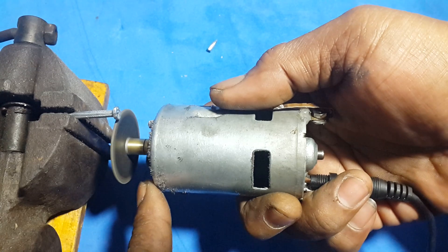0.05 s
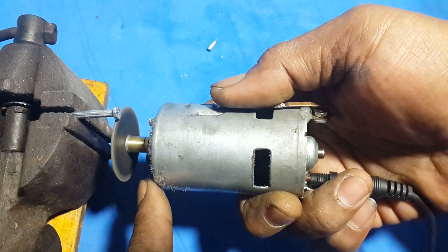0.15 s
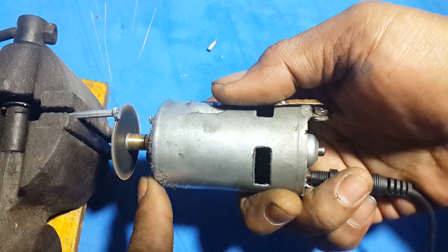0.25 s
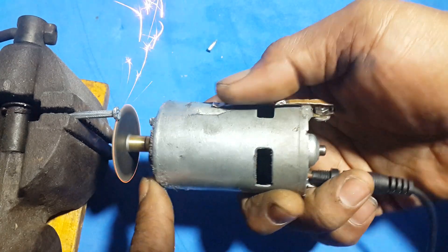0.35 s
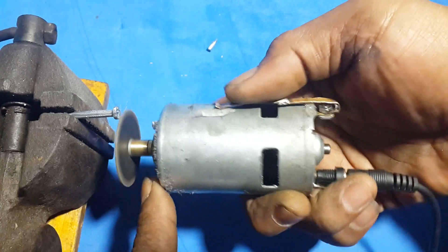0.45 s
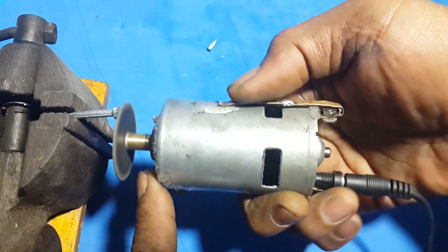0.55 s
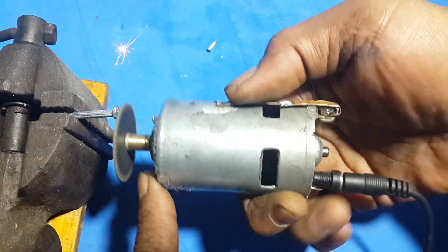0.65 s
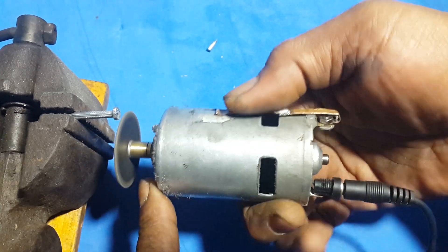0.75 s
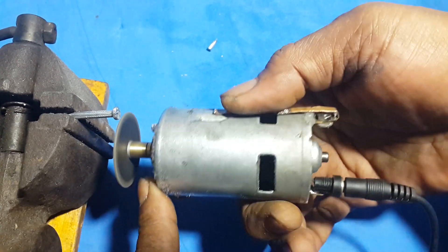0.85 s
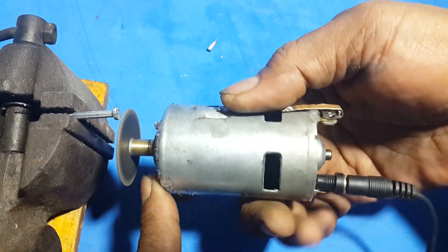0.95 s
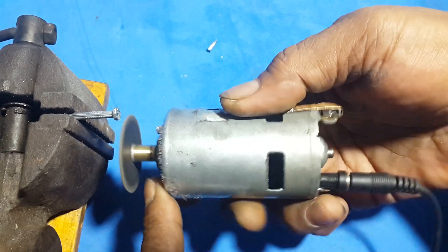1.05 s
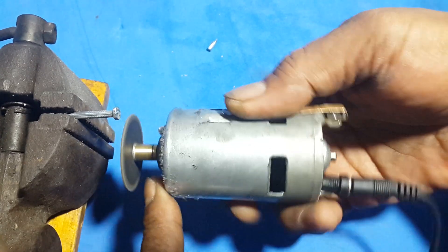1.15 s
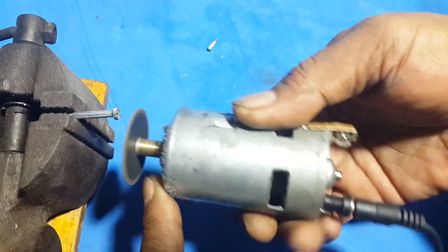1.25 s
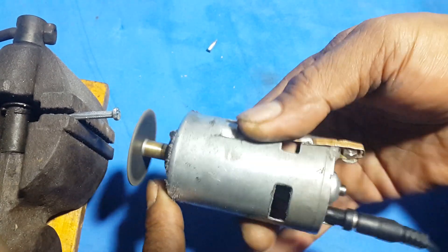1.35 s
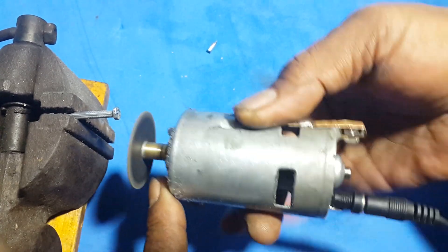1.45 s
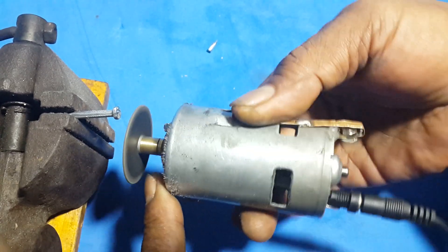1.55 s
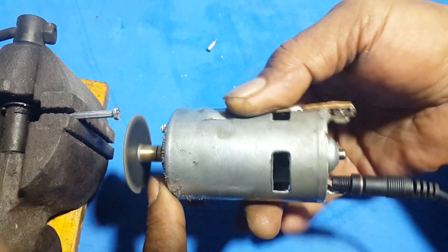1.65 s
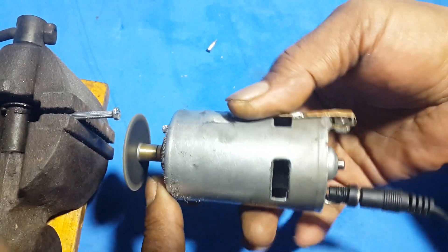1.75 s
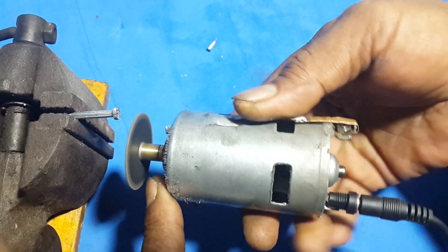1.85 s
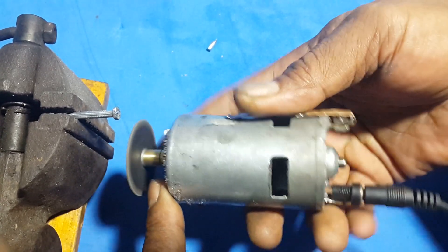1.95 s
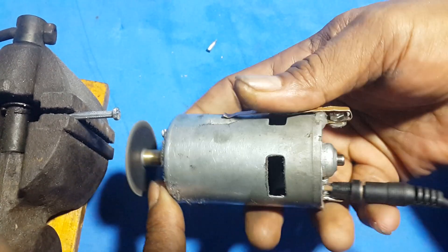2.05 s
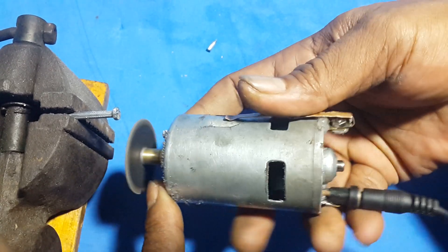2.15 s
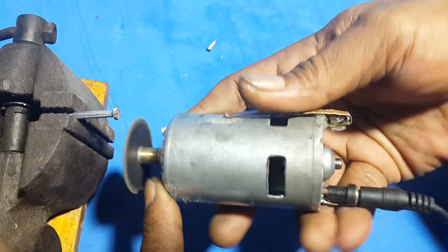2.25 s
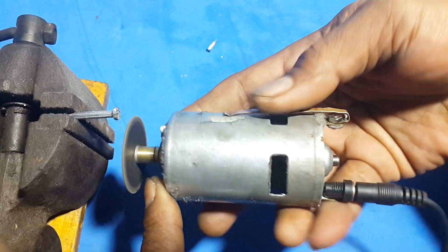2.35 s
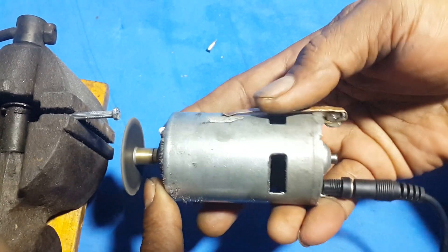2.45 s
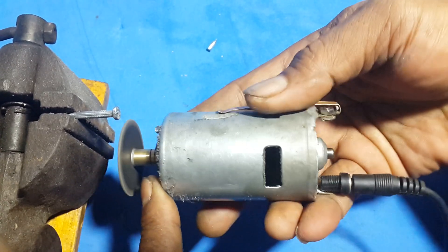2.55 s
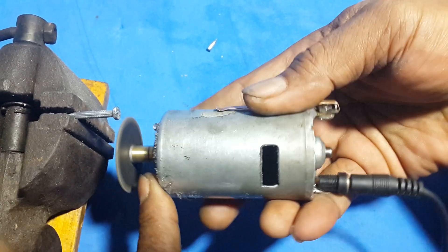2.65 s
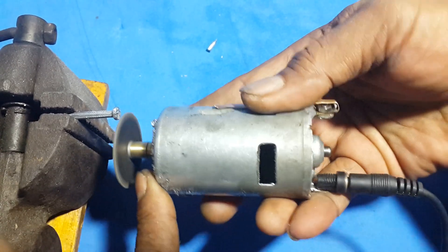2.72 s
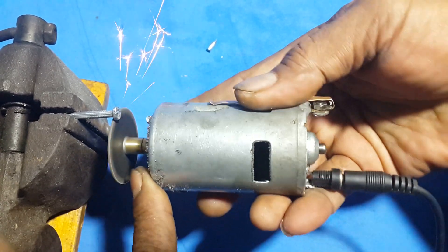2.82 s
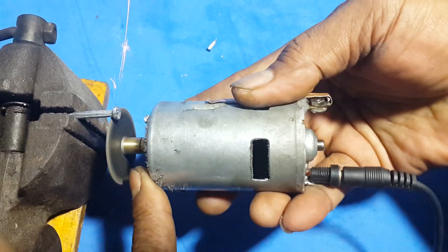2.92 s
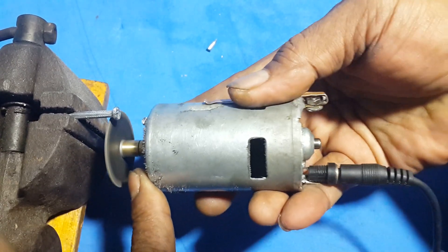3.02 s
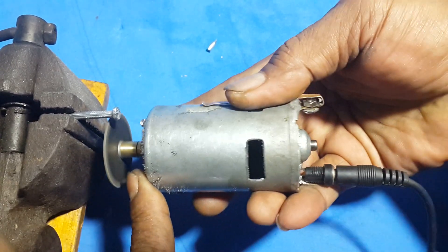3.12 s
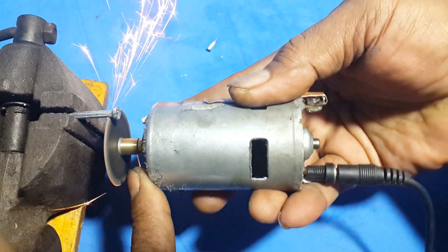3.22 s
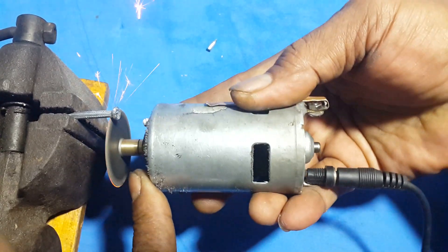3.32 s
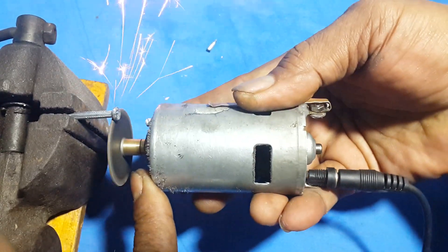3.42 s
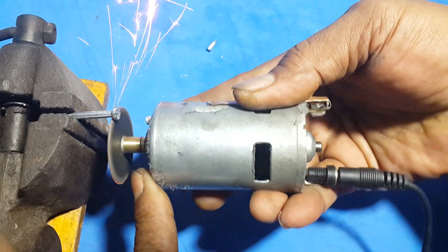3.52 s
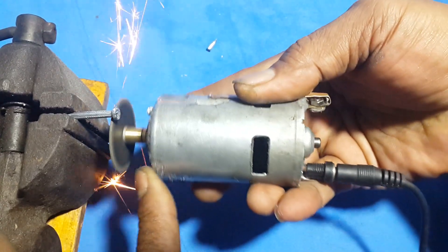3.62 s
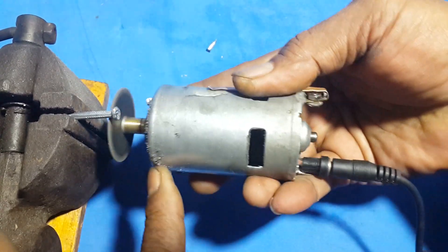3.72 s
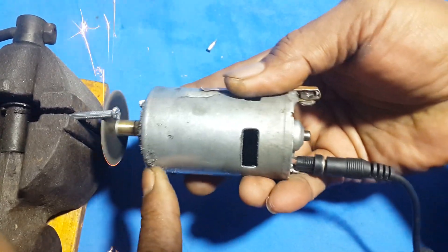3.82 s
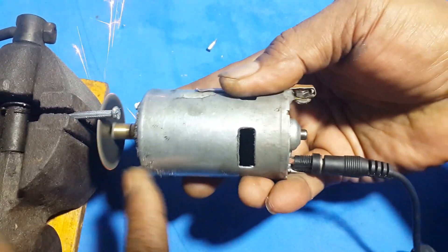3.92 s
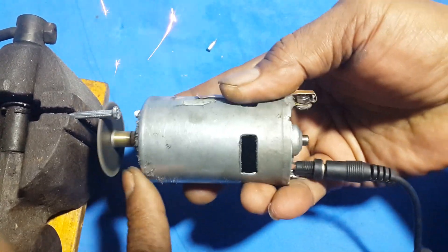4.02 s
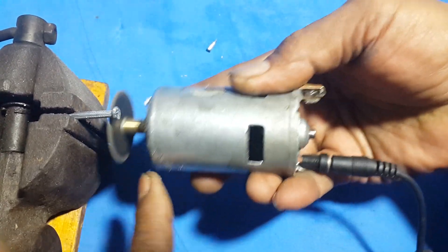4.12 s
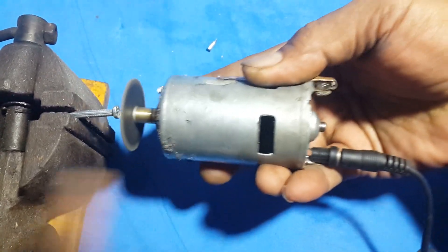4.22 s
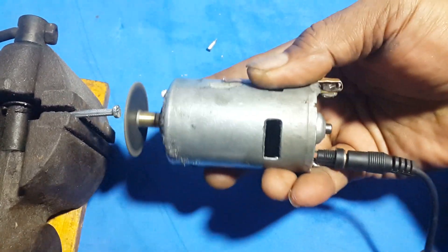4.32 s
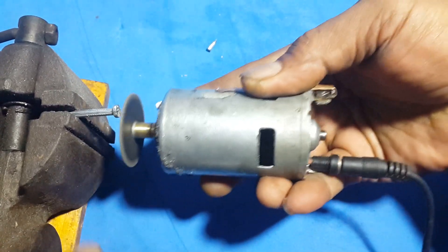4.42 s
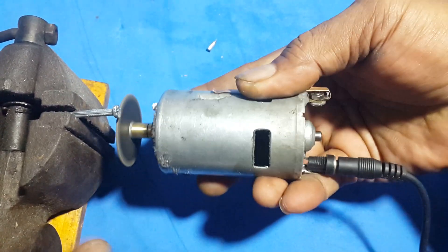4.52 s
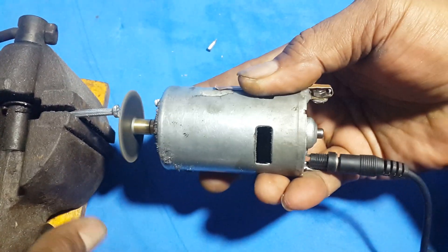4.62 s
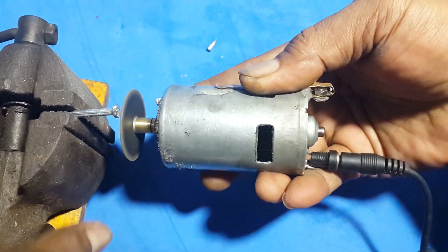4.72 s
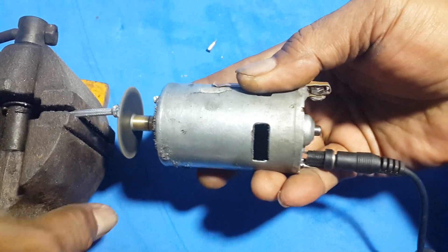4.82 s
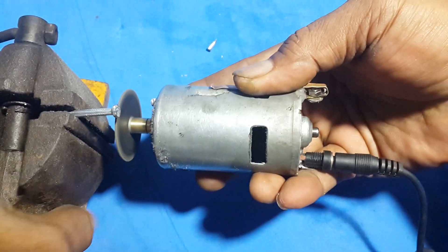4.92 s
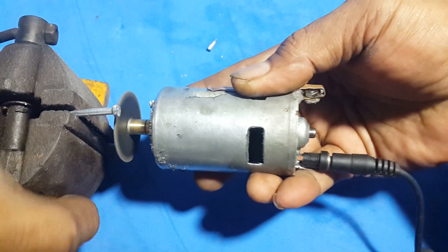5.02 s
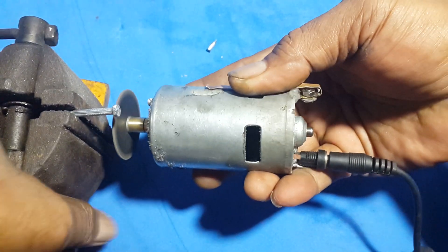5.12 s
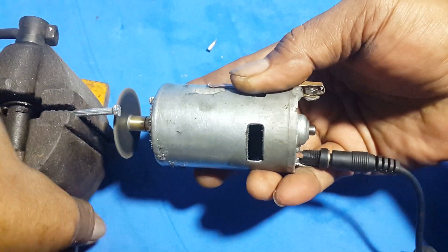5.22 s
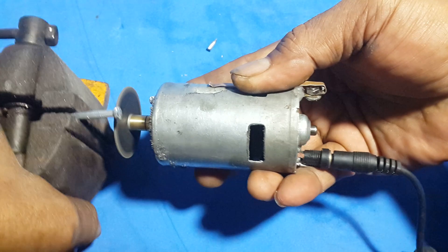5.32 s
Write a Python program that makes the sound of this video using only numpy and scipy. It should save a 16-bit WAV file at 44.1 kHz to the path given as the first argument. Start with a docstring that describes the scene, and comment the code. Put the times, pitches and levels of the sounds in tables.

```python
"""Short rasping scrapes ring over a whirring, whining motor, amid dull bumps, small taps and finger scuffs.
A hand-held motor spins a thin, slightly untrue disc against a nail in a vise: it bites once a turn, and each
bite is rough noise through the resonances of bench, jaw, nail, disc and vise. The motor is brush noise plus
tones on shaft multiples. A gain control drops at loud sounds and climbs back slowly, so the motor swells."""
import sys
import numpy as np
from scipy import signal
from scipy.fft import rfft, irfft, next_fast_len
from scipy.io import wavfile
from scipy.ndimage import uniform_filter1d, minimum_filter1d, map_coordinates

SR = 44100
rng = np.random.default_rng(int(sys.argv[2]) if len(sys.argv) > 2 else 0)


def int16_out(signal):
    """Quantize to a 16-bit WAV file."""
    q = np.round(np.clip(np.atleast_2d(signal).T, -1, 1) * 32767)
    wavfile.write(sys.argv[1], SR, q.astype(np.int16))


N = 236949
TIME = np.arange(N) / SR

# the motor slows under load: time_s, speed_turns_per_s
SHAFT_SPEED = [(0, 109.25), (.44, 109.25), (.6, 106), (1, 109.1), (1.5, 109.25), (1.62, 108.55),
               (1.85, 108.7), (2.1, 109.25), (2.95, 109.4), (3.2, 108.5), (3.36, 108.6), (3.372, 106),
               (3.75, 99), (3.87, 99), (4.2, 106.2), (4.32, 109.2), (4.6, 110.05), (5.37, 109.85)]
# how the force spreads over bench, jaw, nail, disc, vise, coarse grit, fine grit, one row each:
# single_bite_db, long_cut_db (both added to the strength), ring_share, brightness_share (factors)
FORCE_SHARES = [(-26, -28, 0.22, 0.24), (-7.5, -5, -0.27, 0.21), (0.5, 1, 0.057, -0.046),
                (-1.5, -0.5, 1, 0.24), (1, 1.5, -0.064, 0.42), (-1, -1.5, 0.014, 0.78), (3, 2, 0.38, 0.73)]


def amp(db):
    """Decibels to amplitude ratio: 20 dB is a factor of ten."""
    return 10 ** (np.asarray(db) / 20)


def unit(x):
    """Normalisation to a root-mean-square of 1."""
    return x / np.sqrt(np.mean(x ** 2) + 1e-20)


def along(points, hz):
    """Spectral envelope: (Hz, value) points interpolated on a logarithmic frequency axis."""
    f, v = np.transpose(points)
    return np.interp(np.log(hz + 1), np.log(f + 1), v)


def curves(rows):
    """Linear interpolation in time: one value per sample for each column after the time."""
    s, *cols = np.transpose(rows)
    return [np.interp(TIME, s, c) for c in cols]


def wobble(rate):
    """Slow random modulation: a spline through random knots, rate of them a second."""
    knots = rng.standard_normal(int(N * rate / SR) + 4)
    return map_coordinates(knots, [TIME * rate])


def filtered(x, response):
    """Linear filtering: the spectrum multiplied by a complex response of frequency."""
    m = next_fast_len(N + SR // 4)
    spectrum = rfft(x, m) * response(np.fft.rfftfreq(m, 1 / SR))
    return irfft(spectrum, m)[..., :N]


def ports(pair, alike, lean):
    """Stereo coherence: a shared and an opposed part make two ports, with level tilt and arrival lag."""
    lag_s = 1.6e-4  # the left port hears this much earlier

    def response(hz):
        turn = np.arccos(np.clip(along(alike, hz), 0, 1)) / 2
        side = np.array([[1], [-1]])
        level = amp(side * along(lean, hz) / 2)
        tilt = level * np.exp(1j * np.pi * side * hz * lag_s)
        return tilt * np.array([np.cos(turn) + 0 * side, side * np.sin(turn)])
    return filtered(pair[:, None], response).sum(axis=0)


def ringing(force, modes):
    """Forced resonance: rough noise under an envelope drives modes of (centre Hz, width Hz, dB)."""
    def body(f):
        total = 0
        for k, (centre, width, db) in enumerate(modes):
            damping = 1j * f * width
            total = total + (-1) ** k * amp(db / 2) * damping / (centre ** 2 - f * f + damping)
        return total ** 2  # applied twice for steep valleys

    hz = np.linspace(1, SR / 2, 2000)
    grit = rng.standard_normal((2, N)) * amp(2.5 * wobble(1500))
    return filtered(force * unit(grit), body) / np.sqrt(np.mean(abs(body(hz)) ** 2))


def rumble():
    """Broadband room tone: shaped noise whose bass comes in lumps differing between the two parts."""
    # spectrum of the room: pitch_hz, density_db (relative, per Hz)
    room_spectrum = [(15, -46), (30, -12), (124, 2.5), (386, -7), (425, -1), (495, 4.5), (546, 1.5),
                     (601, 2), (1870, -1), (2020, 10), (2500, -37.5), (3250, -2), (5500, -120)]
    # bass of the room: time_s, level_db (rms)
    bass_level = [(0, -67.5), (1, -63.5), (1.6, -64), (2.9, -70), (3.3, -66.5), (4.5, -64), (5.37, -68.5)]
    # low wavering bands: pitch_hz, width_hz, level_db (relative)
    hum_modes = [(252.6, 30, 1.5), (362.6, 34, -2.5), (427.7, 36, 0.5), (480.4, 57, -4)]

    def low(hz):
        return amp(along(room_spectrum, hz)) / (1 + (hz / 280) ** 4)

    def high(hz):
        return amp(along(room_spectrum, hz)) / (1 + (280 / (hz + 1)) ** 4)

    lumps = amp(3.9 * np.array([wobble(14), wobble(36)]))
    bass = filtered(rng.standard_normal((2, N)) * lumps, low)
    rest = filtered(rng.standard_normal((2, N)), high)
    hum = ringing(amp(-74.5 + 1.3 * wobble(3.64)), hum_modes)
    return amp(curves(bass_level)[0]) * unit(bass) + amp(-71) * unit(rest) + hum


def shop(x):
    """Reverberation: convolution with noise in which each frequency decays at its own speed."""
    # decay of the workshop: pitch_hz, t60_s
    decay = [(300, 0.35), (3000, 0.24), (8000, 0.13), (15000, 0.18)]
    hz, t, z = signal.stft(rng.standard_normal((2, SR // 2)), SR, nperseg=256)
    fading = z * amp(-60 * t / along(decay, hz)[:, None])
    tail = signal.istft(fading, SR, nperseg=256)[1]
    delayed = np.pad(x, ((0, 0), (150, 0)))  # samples before the echo begins
    return signal.fftconvolve(delayed, tail / np.linalg.norm(tail[0]), axes=1)[:, :N]


def scuffs():
    """Sliding friction: skin noise rises and falls through the resonances of something hollow."""
    # finger slides: start_s, top_s, end_s, level_db
    slides = [(1.613, 1.643, 1.71, -61.5), (1.7, 1.74, 1.76, -56.5)]
    # the hollow thing: pitch_hz, width_hz, level_db (relative)
    hollow_modes = [(766, 260, 4), (1040, 820, 2)]
    force = 0
    for start, top, end, db in slides:
        force = force + amp(db) * np.interp(TIME, (start, top, end), (0, 1, 0))
    return ringing(force, hollow_modes)


def bumps():
    """Heavily damped impact: hands thud on the bench, about one cycle each, stronger at the right."""
    # thuds: start_s, level_db, pitch_hz
    thuds = [(0.138, -45, 146), (1.587, -34.5, 177), (1.766, -37, 122), (1.871, -43, 96), (2.078, -49, 110),
             (2.717, -51, 123), (4.381, -44.5, 148), (4.465, -41.5, 127), (4.554, -40, 115),
             (4.744, -43.5, 104), (4.839, -46, 96.9), (5.285, -42.5, 111), (5.348, -48.5, 74.4)]
    out, t = np.zeros(N + SR), np.arange(SR // 10) / SR
    envelope = (t / 0.0045) * np.exp(1 - t / 0.0035)
    for s, db, hz in thuds:
        out[round(s * SR):][:len(t)] += amp(db) * np.sin(2 * np.pi * hz * t) * envelope
    return out[:N] * np.array([[.35], [1]])


def taps():
    """Impulsive excitation: a sharp noise click with a short hollow ring of decaying modes."""
    # small taps: start_s, level_db (before an 8.5 dB cut), brightness_db
    strikes = [(1.562, -46.5, -3.5), (1.666, -54, 6), (4.9041, -39, -1)]
    # what a tap rings: pitch_hz, level_db (before brightness), t60_s
    tap_modes = [(700, -10, 0.075), (755, -2, 0.054), (1100, -9, 0.033), (1820, -2, 0.033),
                 (2510, 2, 0.024), (2870, 3, .02)]
    out, t = np.zeros(N + SR), np.arange(SR // 4) / SR
    for s, db, bright_db in strikes:
        ring = 0
        for hz, level, t60 in tap_modes:
            mode_db = level + bright_db * np.log2(hz / 750) / 2
            ring = ring + amp(mode_db - 60 * t / t60) * np.sin(2 * np.pi * hz * t)
        decay = 1.3 * amp(-60 * t / 0.00093) + amp(-60 * t / 0.048)
        crack = amp(bright_db + 11.5) * decay * rng.standard_normal(len(t))
        out[round(s * SR):][:len(t)] += amp(db - 8.5) * (ring + crack)
    return out[:N] * np.array([[1], [.8]])


def motor():
    """Rotational periodicity: brush noise nearly repeats and pulses each turn; tones sit on shaft multiples."""
    # the hand moves the motor: time_s, level_db, facing (0 to just over 2, among the three colours)
    hold = [(0, -52, 0.018), (.42, -51.5, 0.012), (.9, -54, 0.25), (1.3, -52.5, 1.05), (2, -55.5, 0.72),
            (2.9, -54.5, 1.09), (3.3, -53, 0.68), (4.3, -54, 1.9), (4.9, -52.5, 2.06), (5.37, -57.5, 1.85)]
    # motor colour from three sides, one list each: pitch_hz, density_db (relative, per Hz)
    side_spectra = [
        [(880, -56), (1500, -16.5), (2230, -14.5), (3090, -19), (3180, -14.5), (4160, -13.5), (4330, -11.5),
         (4690, -19), (5600, -3), (6370, -11), (8830, -4.5), (10300, -15), (14300, -16.5), (15500, -27),
         (16000, -77)],
        [(880, -28), (1500, -13.5), (1870, -13), (2040, -6), (2300, -11.5), (3060, -11), (3310, -24),
         (3450, -20), (3920, -5), (4690, -10.5), (5490, -2), (7920, -2.5), (10800, -9), (14300, -7),
         (16000, -17)],
        [(880, -18.5), (1500, -15.5), (2100, -9.5), (2230, -6.5), (2940, -13.5), (3220, -11.5), (3550, -10),
         (3840, -5), (5280, -8.5), (5710, 1), (7100, -5), (7920, -1.5), (10900, -16), (12200, -7.5),
         (16000, -11)],
    ]
    # five-bar commutator and cooling vents: shaft_multiple (rounded to whole when sounded),
    # level_db from each of three sides (relative to the motor, before a 2 dB lift)
    whine_levels = [(5, -21, -18.5, -19), (10, -29.5, -30, -36), (15, -27, -18.5, -22.5),
                    (20, -13.5, -44, -27), (30, -17, -10.5, -4.5), (40, -12, -28, -39), (50, -12, -34, -12),
                    (66.6, -7.5, -13, -32), (72.7, -28, -30, -4.5)]
    # the tenth multiple swells once: start_s, top_s, end_s, level_db
    squeak_swell = (4.44, 4.6, 4.63, -66)

    speed, = curves(SHAFT_SPEED)
    db, facing = curves(hold)
    turns = np.cumsum(speed) / SR + 0.0014 * wobble(25)  # the speed wavers

    size, harmonics = 4096, 150
    spectra = rfft(rng.standard_normal((2, 30, size))) * (np.arange(size // 2 + 1) < harmonics)
    patterns = irfft(spectra, size)
    # read round the turn while drifting through 3.5 patterns a second
    place = [TIME * 3.5, turns % 1 * size]
    repeat = np.array([map_coordinates(p, place, order=1, mode="grid-wrap") for p in patterns])
    pulse = amp(0.48 * np.cos(2 * np.pi * turns) + 1.2 * np.cos(4 * np.pi * turns))
    # the pattern fills only its harmonics of some 109 Hz: bring it to the density of plain hiss
    flat = np.sqrt(harmonics * 109 / (SR / 2))
    brush = pulse * (0.63 * flat * unit(repeat) + 0.71 * rng.standard_normal((2, N)))

    hiss = 0
    for k, points in enumerate(side_spectra):
        coloured = unit(filtered(brush, lambda hz: amp(along(points, hz))))
        hiss = hiss + np.sqrt(np.clip(1 - abs(facing - k), 0, 1)) * coloured

    whine = 0
    for k, *levels in whine_levels:
        tone_db = np.interp(facing, range(3), levels) + 2.0 + 1.0 * wobble(5.28) + 1.9 * wobble(25.02)
        whine = whine + amp(tone_db) * np.sin(2 * np.pi * round(k) * turns)

    start, top, end, squeak_db = squeak_swell
    swell = np.interp(TIME, (start, top, end), (0, 1, 0))
    squeak = amp(squeak_db) * swell * np.sin(2 * np.pi * 10 * turns)
    tones = (amp(db) * whine + squeak) * np.array([[1], [.2]])  # mostly shared by both ports
    return amp(db) * hiss + tones


def long_cut():
    """Once-per-turn modulation: an untrue rim bites each turn and drags in between; force on each body."""
    # the long cut: time_s, strength_db, disc_ring_db, brightness_db (last two weighted by the shares)
    cut_course = [(3.38, -27, -8, -3), (3.47, -27, 3, 1), (3.6, -25.5, 4.5, 1), (3.71, -24.5, 3, 2.5),
                  (3.75, -24.5, -0.5, 4.5), (3.83, -25, 0.5, 0), (3.92, -24, 0, -3.5),
                  (4.0, -26.5, -2.5, -6.5), (4.12, -28.5, -4.5, -2.5), (4.196, -27.5, -5, 0),
                  (4.205, -41, -4, -9)]
    contact_s = 3.372
    _, long_db, rings, brightens = np.transpose(FORCE_SHARES)[:, :, None]
    turns = np.cumsum(curves(SHAFT_SPEED)[0]) / SR
    turns = np.clip(turns - turns[round(contact_s * SR)], 0, 99)
    whole = np.round(turns).astype(int)

    # chance strength, timing, width and colour of each turn
    size, shift, width, *colour = rng.standard_normal((100, 10)).T
    u = (turns - whole - 0.054 * shift[whole]) / (.14 * amp(2 * width[whole]))
    bite = amp(0.85 * size[whole]) * np.exp(-np.where(u < 0, abs(u) ** 1.25, u / 0.63))
    coloured_bite = bite * amp(1.16 * np.array(colour)[:, whole])
    drag = amp(-16 + 2.6 * wobble(150))  # the rim keeps rubbing between bites

    inside = (TIME > cut_course[0][0]) & (TIME < cut_course[-1][0])
    db, ring_db, bright_db = curves(cut_course)
    level = amp(db + long_db + rings * ring_db + brightens * bright_db)
    return inside * level * (coloured_bite + drag)


def single_bites(force):
    """Transient contact: each bite swells and fades in milliseconds; the stronger force prevails."""
    # the clearest bites: peak_s, span_ms (scales rise and fall), strength_db, disc_ring_db, brightness_db
    # (last two weighted by the shares)
    bite_list = [(0.4453, 13, -33.5, -10, -10), (.452, 1.64, -14, -2, 7), (0.4784, 4.7, -25.5, -14, 0),
                 (0.4992, 5.1, -24, -8, 5), (0.517, 3.2, -24.5, -10, 7), (.5273, 3.9, -24.5, 2, 4),
                 (0.5432, 6.8, -26, -7, 10), (0.563, 3.7, -23.5, 0, 3), (0.581, 9, -25, 2.5, 1),
                 (0.5939, 2.9, -22.5, -16, -1), (0.6021, 2.4, -22.5, 8, -2), (0.6113, 2.6, -29, 13.5, -4),
                 (0.621, 2.4, -20, 1, -4), (.641, 3.4, -23.5, 3.5, 0), (0.649, 3.1, -22.5, 0, 3.5),
                 (0.67, 5.1, -20, -1.5, 3.5), (0.7953, 2.1, -19.5, 3, 2.5), (0.8018, 3.8, -21.5, 3.5, -4),
                 (0.813, 3.9, -23, -5, -5), (0.8205, 3.8, -17, 3, 0), (0.8381, 4.4, -18, -3, -2),
                 (0.8576, 3.9, -24.5, 4, 9), (0.8754, 4.5, -22, -2, 4), (0.894, 4.5, -28, 0.5, 10),
                 (0.93, 13, -41.5, -19, 4), (1.101, 4.2, -23, -4, 3), (2.1622, 12, -50, -9, 5),
                 (2.9556, 2.4, -17.5, 3.5, -3), (2.995, 4.9, -29, -9, 5), (3.0003, 5.2, -25, 0.5, 7),
                 (3.0228, 1.9, -29.5, -8, 9), (3.0302, 2.7, -25.5, -2, 7), (3.039, 4.3, -26, -6, 8.5),
                 (3.048, 7.1, -39, -16, 6), (3.058, 4.7, -27, 3, -1), (3.067, 3.7, -24.5, -4, -3),
                 (3.0858, 2, -22, 4.5, -6), (3.105, 2.65, -19.5, 0, -10.5), (3.1333, 4.5, -20.5, -0.5, -7),
                 (3.371, 2, -20, 12.5, -4), (3.3988, 2.6, -22, 3.5, 1), (3.428, 5.6, -21.5, -6, -23),
                 (3.4652, 2.3, -27, 8.5, 9), (3.5147, 5.9, -22, -1, -3), (3.5714, 3.2, -22.5, 9.5, -5),
                 (3.5825, 2.1, -22, 10, -4), (3.67, 2.5, -26, 11, 3), (3.701, 2.4, -26.5, 19, -5),
                 (3.9134, 1.4, -17.5, 2, -14), (3.9605, 4, -18.5, 1, -11), (4.0024, 2.2, -15.5, -8, -15),
                 (4.0843, 1.2, -21, -8, -21), (4.2235, 4.5, -26, -8, -7.5)]
    single_db, _, rings, brightens = np.transpose(FORCE_SHARES)[:, :, None]
    colours_db = rng.standard_normal((len(bite_list), 7, 1))  # chance colour, 1 dB deviation
    for (s, ms, db, ring_db, bright_db), chance_db in zip(bite_list, colours_db):
        u = (np.arange(-800, 1500) / SR) / (ms / 1000)
        swell = np.exp(-np.where(u < 0, abs(u / 0.41) ** 0.97, u / .5))
        swell += 0.028 * np.exp(-np.where(u < 0, -u / 0.39, u / 0.52))  # light rubbing before and after
        level = amp(db + single_db + rings * ring_db + brightens * bright_db + chance_db)
        part = force[:, round(s * SR) - 800:][:, :len(u)]
        part[:] = np.maximum(part, level * swell)
    return force


def cutting():
    """Source and resonator: the biting force rings bench, jaw, nail, disc and vise, and sprays grit."""
    # resonances of each body and bands of the grit: pitch_hz, width_hz, level_db (relative)
    bench_modes = [(257, 340, -6.5), (790, 520, 4), (1177, 1010, -1)]
    jaw_modes = [(1951, 440, -13), (2235, 225, 1), (2800, 420, -5)]
    nail_modes = [(3384, 196, -2.5), (3896, 394, 1.5), (4473, 450, -0.5)]
    disc_modes = [(5010, 580, -8), (5532, 420, 1.5), (6250, 590, -11)]
    vise_modes = [(6796, 720, -4.5), (7830, 550, 3), (9210, 1350, -5)]
    coarse_grit = [(10290, 1800, -2.5), (12650, 980, 6.5)]
    fine_grit = [(13300, 170, -2), (13940, 690, -1), (15350, 430, 2.8)]
    bodies = (bench_modes, jaw_modes, nail_modes, disc_modes, vise_modes, coarse_grit, fine_grit)
    force = single_bites(long_cut())
    return sum(ringing(f, modes) for f, modes in zip(force, bodies))


def scene():
    """Superposition: cutting with its echo, over motor, hands and room."""
    # left-right likeness of the background and of the cutting: pitch_hz, likeness (0 to 1)
    back_alike = [(60, 0.02), (130, 0.33), (290, 1), (640, 0.57), (1400, 0.29), (3300, 0.22),
                  (16000, 0.067)]
    cut_alike = [(300, 0.63), (1500, 0.49), (3300, 0.56), (8000, 0.33), (16000, 0.4)]
    # left minus right of the background and of the cutting: pitch_hz, difference_db
    back_lean = [(60, -10), (110, -3), (200, -1.5), (380, 2), (700, -2), (1290, 4.5), (2380, -6),
                 (4400, 9.5), (8120, -3.5), (15000, -3)]
    cut_lean = [(300, 0), (950, 0.5), (2300, 2.5), (4400, 6.5), (6200, 6.5), (8500, -4.5), (12000, -4.5),
                (15000, 2)]
    bites, clicks = cutting(), taps()
    work = ports(bites + amp(-10.0) * shop(bites), cut_alike, cut_lean)
    background = ports(motor() + scuffs() + rumble(), back_alike, back_lean)
    return work + background + bumps() + clicks + amp(-1.5) * shop(clicks)


def record(dry):
    """Automatic gain control: loud sound resets the gain, which waits and climbs; peaks round off; band limit."""
    top_hz, ceiling = 16812, .9
    loud = uniform_filter1d(np.mean(dry ** 2, axis=0), 130) > amp(-33) ** 2
    since = TIME - np.maximum.accumulate(np.where(loud, TIME, -9))  # s since the last loud sound
    climb = np.clip((since - .5) / 0.92, 0, 1)  # waits 0.5 s, climbs for 0.92 s
    boost_db = 18 * climb ** 2 * (3 - 2 * climb)
    ahead = 800  # samples: the gain eases down over some 35 ms before the sound
    boost_db = uniform_filter1d(minimum_filter1d(boost_db, 2 * ahead), 2 * ahead)

    def edge(hz):
        return (hz < top_hz) / np.sqrt(1 + (hz / 15750) ** 120)

    boosted = dry * amp(boost_db)
    rounded = boosted / (1 + abs(boosted / ceiling) ** 4) ** .25
    return filtered(rounded, edge)


dry = scene()
out = record(dry)
int16_out(out)
```